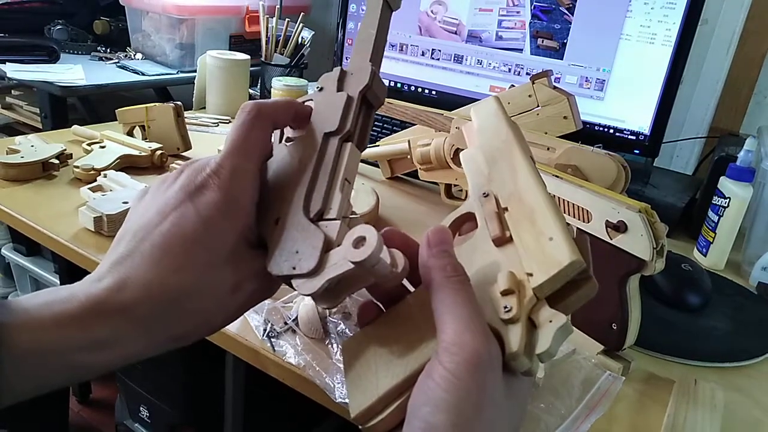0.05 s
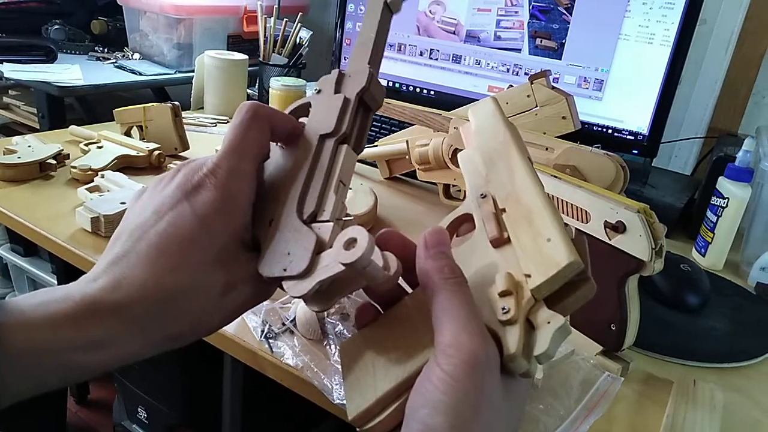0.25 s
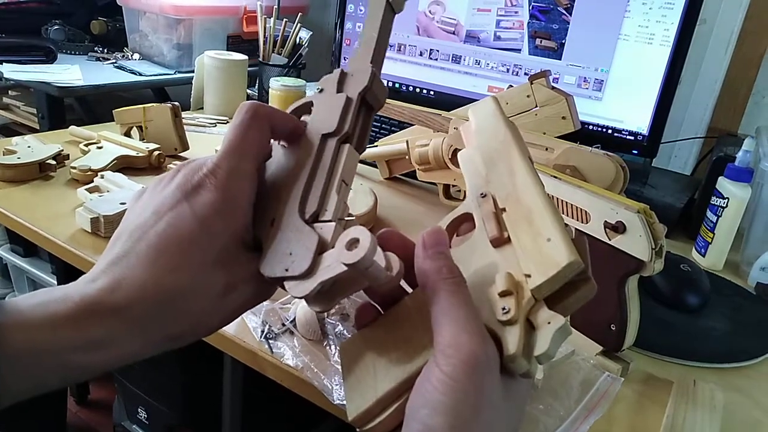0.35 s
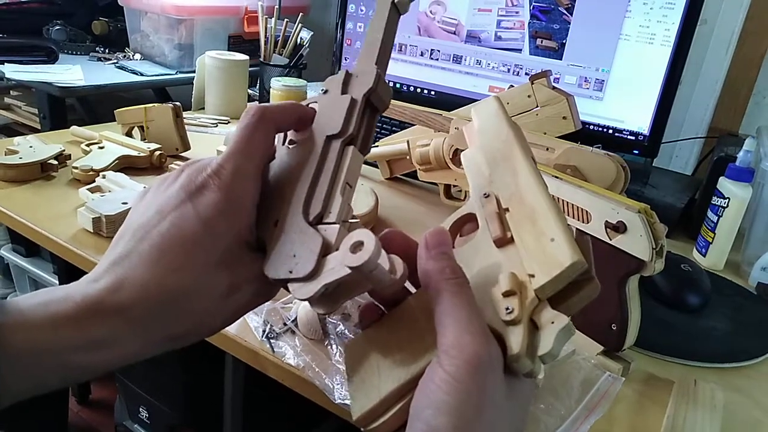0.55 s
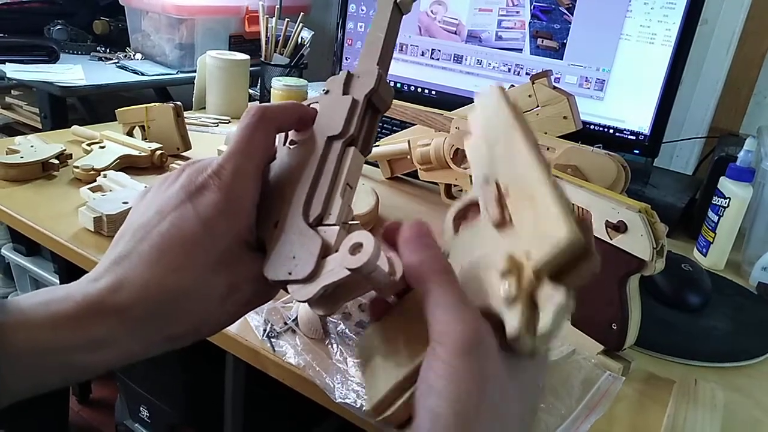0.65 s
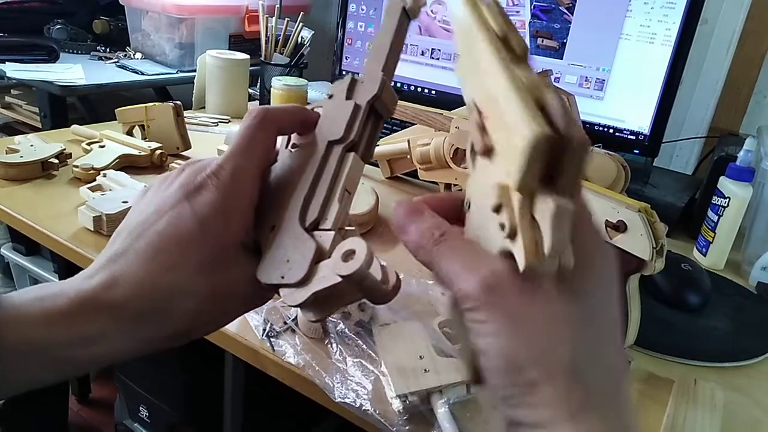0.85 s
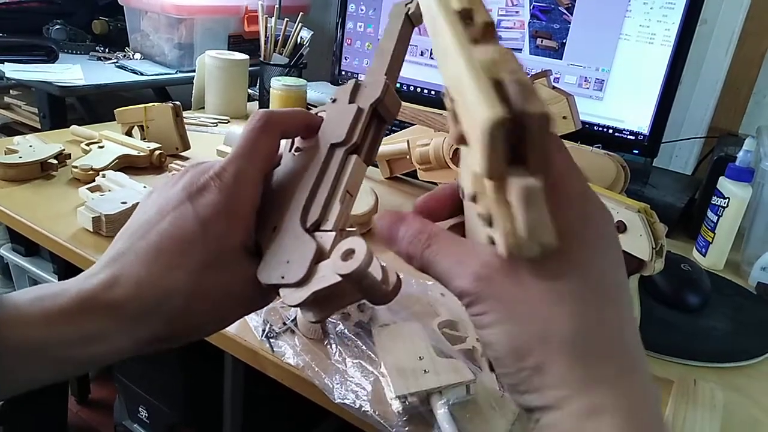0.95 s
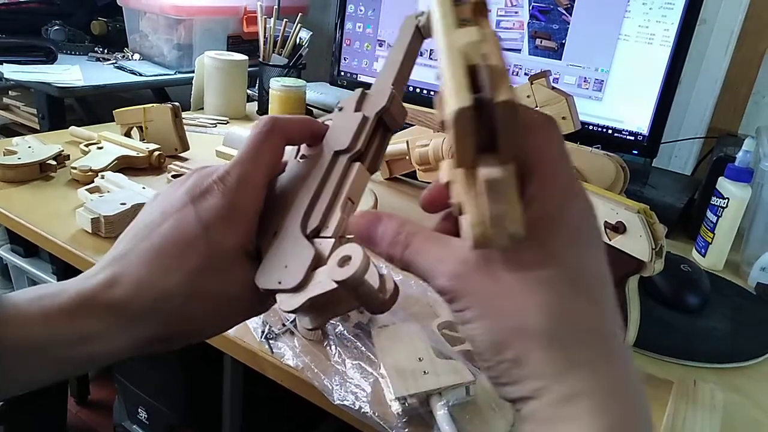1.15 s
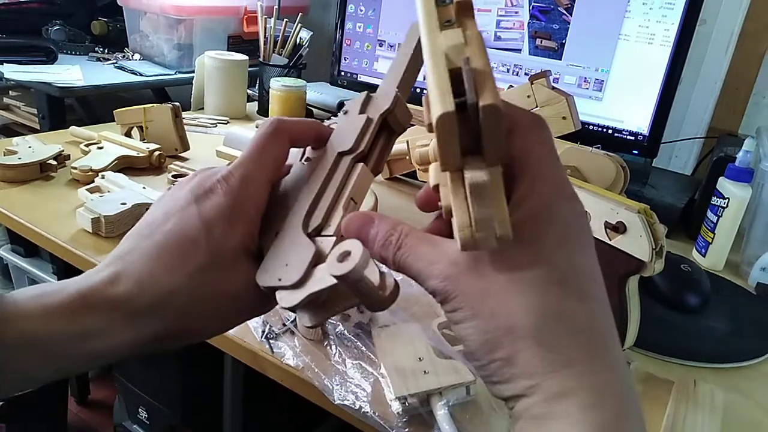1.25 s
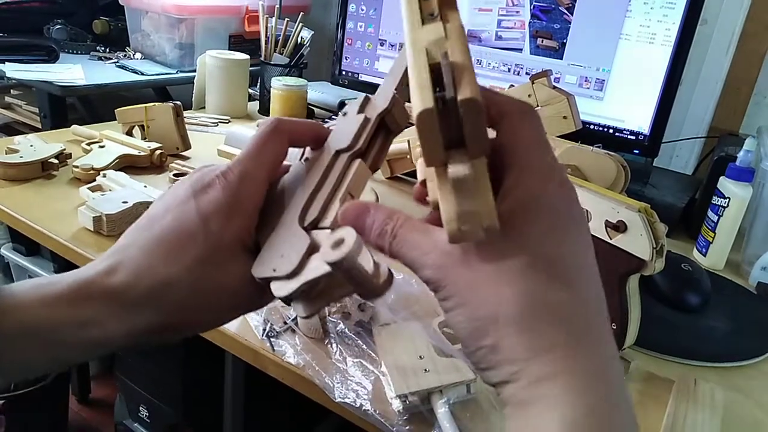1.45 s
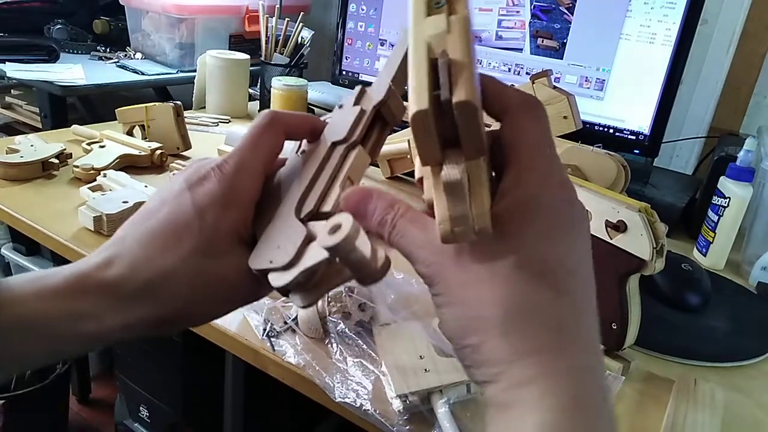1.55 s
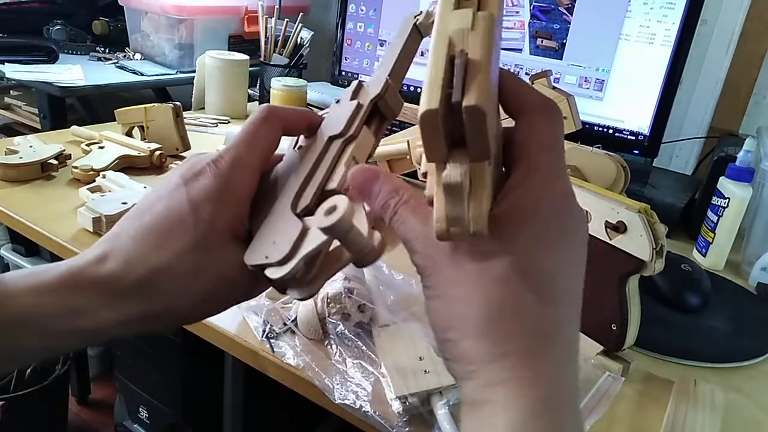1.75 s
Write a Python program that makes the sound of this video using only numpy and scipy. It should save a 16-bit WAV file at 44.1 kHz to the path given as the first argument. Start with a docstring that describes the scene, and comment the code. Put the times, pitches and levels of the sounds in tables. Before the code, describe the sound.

Two sharp clacks come from a wooden toy gun held near the microphone, the first a little stronger. Afterward its loose parts tap and rub lightly, with a faint electrical hum in the small room.

```python
"""Wooden toy guns at a desk

Toy guns are handled close to a phone with two microphone ports. A spring mechanism snaps twice, each
time in a pair of blows that excite the modes of the plywood and the reverberation of a small room.
Loose parts tap and slide softly, sounding the hollow body. Under it all lie a low hum and faint,
regular electrical thumps on the right."""
import sys
import numpy as np
from scipy import signal
from scipy.fft import rfft, irfft, next_fast_len
from scipy.io import wavfile
from scipy.ndimage import uniform_filter1d

SR = 44100
rng = np.random.default_rng(int(sys.argv[2]) if len(sys.argv) > 2 else 0)


def store_wav(level_fs):
    """Save 16-bit WAV to argv[1]."""
    pcm = np.round(np.clip(np.atleast_2d(level_fs), -1, 1) * 32767)
    wavfile.write(sys.argv[1], SR, pcm.T.astype(np.int16))


N = 79380

# envelopes of the hum and the electrical thumps (time [s], level [dB])
HUM_ENVELOPE = [(0.0, -64), (0.15, -81), (0.17, -62.5), (0.366, -57.5), (0.396, -84), (0.48, -57.5),
                (0.506, -90), (0.54, -54), (0.576, -67), (0.946, -63.5), (0.986, -71), (1.012, -71),
                (1.232, -59), (1.248, -62.5), (1.774, -77), (1.8, -70.5)]
THUMP_ENVELOPE = [(0, -54.5), (.31, -55.5), (.62, -54), (.72, -57.5), (1.23, -56.5), (1.34, -58.5),
                  (1.44, -54.5), (1.54, -62), (1.75, -54)]
# spectral shapes (frequency [Hz], relative level [dB])
RUMBLE_SPECTRUM = [(20, -11.5), (50, -5), (90, 5), (150, -10), (300, -9.5), (400, -18.5), (550, -43.5),
                   (1000, -48)]
EDGE_SPECTRUM = [(300, -10), (600, -16), (930, 3), (1200, -13), (1500, -5), (2100, -20), (6000, -25.5),
                 (12000, -40)]
ROOM_SPECTRUM = [(150, -24), (520, -26), (850, -16), (1900, -7.5), (3000, 0), (3850, 1.5), (4200, -4.5),
                 (4900, 3.5), (6300, 2.5), (8300, -3.5), (9300, -9.5), (10500, -9), (12000, -18.5),
                 (14000, -23)]
SLIDE_SPECTRUM = [(500, -23), (1500, -5.5), (2200, -7.5), (3400, -5), (5200, -6), (6900, 5.5), (8500, -18),
                  (13000, -27)]
TAP_SPECTRUM = [(200, -23), (560, -31), (780, -9.5), (1150, 1), (1700, -6.5), (2800, 2), (4300, -2),
                (6600, 4), (8300, -4.5), (9500, -20.5), (13000, -33.5)]
CRACK_SPECTRUM = [(100, -28), (550, -30.5), (820, -12.5), (1700, -7.5), (3100, -11), (4250, -7.5),
                  (4900, -2), (5500, -9), (6500, -2.5), (7300, -1.5), (8000, -4), (9200, -14.5),
                  (10000, -7.5), (11500, -18.5), (14000, -16)]
# reverberation time of the room (frequency [Hz], T60 [s])
ROOM_T60 = [(500, 0.42), (1300, 0.32), (3500, .25), (7000, 0.21), (13000, 0.28)]
# resonances of the hollow body (frequency [Hz], width [Hz], level [dB])
CAVITY_MODES = [(950, 290, -9.5), (1440, 170, 1), (2690, 170, -6.5), (3670, 130, -0.5), (4983, 130, 1.5),
                (6530, 440, 0), (7700, 320, -12)]
# modes of the plywood (frequency [Hz], relative level [dB], T60 [s])
GUN_MODES = [(1140, -19, .18), (1350, -18, .18), (2662, -7, .25), (2788, -8, .25), (3124, -4, .24),
             (3817, -3, .24), (3933, -5, .24), (4377, -6, .27), (4870, -2, .25), (5702, 0, .2),
             (6364, 1, .22), (6484, -1, .25), (6962, -3, .25)]
# imbalance of the snaps at the ports (frequency [Hz], left over right [dB])
PORT_BALANCE = [(400, -8.5), (1200, 1), (2500, 2), (4500, 0), (6300, 4.5), (8000, 7), (11000, 0)]
# bumps through the hands (time [s], level [dB], pan [dB], half width [s])
THUDS = [(0.203, -52.5, 0, .0012), (1.7073, -57, -23, 0.00093)]
# wood on wood (time [s], hold [s], release [s], level [dB], pan [dB], tilt [dB/octave], hollowness [0-1])
SLIDES = [(0.062, 0.044, 0.047, -66, 4, 3, 0.94), (0.152, 0.1, .01, -63, 1.5, 2.5, 0.2),
          (0.678, 0.019, 0.059, -75.5, 10, 3, 0.39), (0.992, 0.044, 0.028, -73, 3, -1, 0.29),
          (1.032, .012, 0.043, -64.5, 6.5, 5.5, 0.41), (1.669, 0.061, 0.046, -77, 6.5, 2.5, 0.8)]
# knocks of loose parts (time [s], relative level [dB], pan [dB], decay [s], tilt [dB/octave],
# room [dB], hollowness [0-1], resonance [Hz])
TAPS = [(0.423, -39, 2, 0.0013, 8, -1.5, .05, 10000), (0.4432, -38, 1.5, .003, -5, -6, .1, 1250),
        (0.6211, -57, -8, .0015, -3, -15, 0.62, 3500), (0.9349, -37, 1, 0.0024, -1, -3.5, .2, 3150),
        (0.9361, -37.5, 1.5, 0.0026, -3, -18, 0.15, 1200),
        (1.7060, -47.5, -10, 0.0017, -3.5, -10.5, 0.96, 1000),
        (1.7463, -53.5, -12.5, 0.0041, -8, -16, .6, 1050), (1.7511, -48, 0.5, 0.0061, 3, -3, 0.54, 2950)]
# blows of the mechanism (time [s], relative level [dB], pan [dB], decay [s], tilt [dB/octave],
# room [dB], ring [dB], resonance [Hz], weight of the main contact [ratio])
SNAPS = [(0.2004, -22, 1.5, 0.0036, -2.5, -9, -11.5, 2000, .1),
         (0.2028, -4, -4.5, .0007, -1, -2.5, -9.5, 3780, .45),
         (0.2113, -4.5, -1, .0011, 4, -1.5, -9.5, 5640, .3),
         (0.4639, -18.5, 0, 0.0026, -3, -4.5, -20.5, 2040, .1),
         (0.4679, -8, 4, 0.00038, 1.28, -8, -21, 5720, 0.88)]

BLOW_GAIN_DB = 13  # common to taps and snaps
BIN_HZ = np.arange(N // 2 + 1) * SR / N
GRID_HZ = np.geomspace(100, 20000, 600)


def undb(db):
    return 10 ** (np.asarray(db) / 20)


def unit_energy(x):
    return x / np.sqrt(np.sum(x ** 2, axis=-1, keepdims=True))


def noise():
    return rng.standard_normal((2, N))


def pan(db):
    """Level difference between channels: positive is to the left."""
    return undb(np.array([[db], [-db]]) / 2)


def since(start):
    return np.arange(N) / SR - start


def on_log_hz(hz, points):
    knots_hz, values = np.array(points, float).T
    return np.interp(np.log(hz), np.log(knots_hz), values)


def colour(x, spectrum, tilt_db=0):
    """Minimum-phase filtering, tilted per octave above 500 Hz; white noise keeps its power."""
    size = next_fast_len(N) * 2
    hz = np.maximum(np.arange(size // 2 + 1) * SR / size, 1)
    gain = undb(on_log_hz(hz, spectrum) + tilt_db * np.log2(np.maximum(hz, 500)))
    cepstrum = irfft(np.log(gain / np.sqrt(np.mean(gain ** 2))))
    cepstrum[1:size // 2] *= 2  # folding the cepstrum makes the filter causal
    cepstrum[size // 2 + 1:] = 0
    return irfft(rfft(x, size) * np.exp(rfft(cepstrum)))[..., :N]


def wander(rate_hz):
    """Random modulation: smoothed steps with a standard deviation of one."""
    step = max(int(SR / rate_hz), 2)
    stairs = np.repeat(rng.standard_normal(N // step + 1), step)
    smooth = uniform_filter1d(stairs, step)[:N]
    return smooth / smooth.std()


def swing(start, half_width_s):
    """Gaussian derivative: one down-up pulse with a peak of one."""
    u = since(start) / half_width_s
    return u * np.exp((1 - u ** 2) / 2)


def background(hum_hz=59.7, waver_hz=2.1, hum_gain_db=1, rumble_db=-69, hiss_db=-87.5):
    """A hum modulated in frequency and amplitude, over the broadband noise of room rumble and hiss."""
    phase = 2 * np.pi * np.cumsum(hum_hz + waver_hz * wander(12)) / SR
    envelope = undb(hum_gain_db + np.interp(since(0), *np.array(HUM_ENVELOPE).T))
    hum = np.sqrt(2) * np.sin(phase) * envelope * pan(8)
    mid, side = colour(noise(), RUMBLE_SPECTRUM)
    rumble = mid + 0.95 * side * np.array([[1], [-1]])
    hiss = colour(noise(), [(500, 1.5), (3000, -4), (14000, -10)])
    return hum + undb(rumble_db) * rumble + undb(hiss_db) * hiss


def thumps(first_s=0.0052, period_s=0.10243, scatter_db=1.4, edge_db=-4.5):
    """Electrical interference: a periodic train of low pulses, each with a faint sharp edge."""
    swings, edges = np.zeros(N), np.zeros(N)
    for start in np.arange(first_s, N / SR, period_s):
        db = np.interp(start, *np.array(THUMP_ENVELOPE).T) + scatter_db * rng.standard_normal()
        swings += undb(db) * swing(start, half_width_s=0.00093)
        edges[int(start * SR)] = undb(db + edge_db)
    return (swings + colour(edges, EDGE_SPECTRUM)) * pan(-18)


def room(start, gap_s=0.00067, build_s=0.0026):
    """Diffuse reverberation: reflections build up, then decay exponentially in each octave band."""
    t = np.maximum(since(start + gap_s), 0)
    spectrum = rfft(noise())
    octave = np.log2(np.clip(BIN_HZ, 250, 16000) / 250)
    out = 0
    for k in range(7):
        band = irfft(spectrum * np.maximum(1 - np.abs(octave - k), 0), N)
        t60 = on_log_hz(250 * 2 ** k, ROOM_T60)
        out += band * np.exp(-np.log(1000) * t / t60)
    return unit_energy(out * (1 - np.exp(-t / build_s)))


def thuds():
    """Soft contact: the guns shift in the hands, giving broad pulses of low-frequency energy."""
    return sum(undb(db) * pan(pan_db) * swing(start, width) for start, db, pan_db, width in THUDS)


def hollow(spectrum, hollowness):
    """Cavity resonance: the peaks of the hollow body add in power to the spectrum of solid wood."""
    cavity = sum(undb(db) ** 2 / (1 + ((GRID_HZ - hz) / width) ** 2) ** 3
                 for hz, width, db in CAVITY_MODES)
    solid = undb(on_log_hz(GRID_HZ, spectrum)) ** 2
    power = hollowness * cavity + (1 - hollowness) ** 2 * solid
    return np.column_stack([GRID_HZ, 10 * np.log10(power + 1e-9)])


def resonance(spectrum, peak_hz, peak_db, width_hz):
    """A single resonance raises a bell-shaped peak on a spectrum."""
    boost_db = peak_db / (1 + ((GRID_HZ - peak_hz) / width_hz) ** 2)
    return np.column_stack([GRID_HZ, on_log_hz(GRID_HZ, spectrum) + boost_db])


def slides(attack_s=0.0094, roughness_db=3):
    """Sliding friction: grainy noise excites the hollow body with each small movement."""
    out = 0
    for start, hold, release, db, pan_db, tilt_db, hollowness in SLIDES:
        t = since(start)
        swell = np.clip(t / attack_s, 0, 1) * np.exp(-np.maximum(t - hold, 0) / release)
        grain = undb(roughness_db * wander(210))
        friction = noise() * swell * grain / np.sqrt(np.mean(grain ** 2))
        out += undb(db) * pan(pan_db) * colour(friction, hollow(SLIDE_SPECTRUM, hollowness), tilt_db)
    return out


def crack(start, decay, contact, port_lag_s=0.00009):
    """Impact transient: a quick build-up, the impulse of contact, then dense chatter inside the wood."""
    t = since(start)
    time_constant = np.where(t < 0, 0.4 * decay, decay)
    chatter = unit_energy(noise() * np.exp(-np.abs(t) / time_constant))
    chatter[0, int((start + port_lag_s) * SR)] += contact  # the left port hears it later
    chatter[1, int(start * SR)] += contact
    return unit_energy(chatter)


def taps():
    """Source and filter: light impacts of loose parts are coloured by the hollow wooden body."""
    out = 0
    for start, db, pan_db, decay, tilt_db, room_db, hollowness, peak_hz in TAPS:
        wood = resonance(hollow(TAP_SPECTRUM, hollowness), peak_hz, peak_db=7, width_hz=360)
        knock = crack(start, decay, contact=0.4) + undb(room_db) * room(start)
        out += undb(db) * pan(pan_db) * colour(knock, wood, tilt_db)
    return undb(BLOW_GAIN_DB) * out


def ring(start):
    """Free vibration: the modes of the gun decay as damped sinusoids of random phase."""
    t = np.maximum(since(start), 0)
    out = 0
    for hz, db, t60 in GUN_MODES:
        fade = (t > 0) * np.exp(-np.log(1000) * t / t60)
        out += undb(db) * fade * np.sin(2 * np.pi * (hz * t + rng.random((2, 1))))
    return unit_energy(out)


def snaps():
    """Impulsive excitation: each blow of the spring mechanism cracks, rings the gun and fills the room."""
    out = 0
    for start, db, pan_db, decay, tilt_db, room_db, ring_db, peak_hz, contact in SNAPS:
        wood = resonance(CRACK_SPECTRUM, peak_hz, peak_db=7.5, width_hz=320)
        direct = colour(crack(start, decay, contact), wood, tilt_db) * pan(pan_db)
        reverberation = undb(room_db) * colour(room(start), ROOM_SPECTRUM)
        out += undb(db) * (direct + reverberation + undb(ring_db) * ring(start))
    balance_db = on_log_hz(np.maximum(BIN_HZ, 1), PORT_BALANCE)
    port_gains = undb(np.array([balance_db, -balance_db]) / 2)
    return undb(BLOW_GAIN_DB) * irfft(rfft(out) * port_gains, N)


def scene():
    """Superposition: the sources add linearly in each channel."""
    return snaps() + taps() + slides() + thuds() + background() + thumps()


def record(dry):
    """Saturation and band limiting: the phone rounds the loudest peaks and cuts the highest treble."""
    ceiling, cutoff_hz = 1.6, 14400
    lowpass = signal.ellip(8, .2, 80, cutoff_hz, fs=SR, output="sos")
    return signal.sosfilt(lowpass, ceiling * np.tanh(dry / ceiling))


dry = scene()
out = record(dry)
store_wav(out)
```